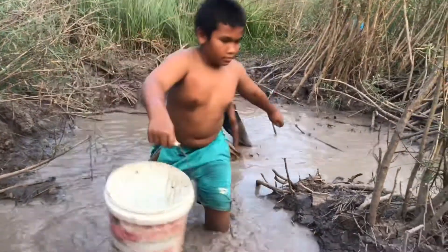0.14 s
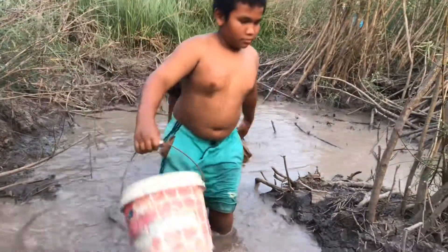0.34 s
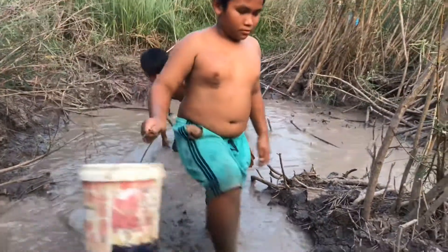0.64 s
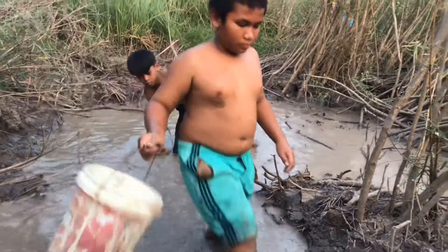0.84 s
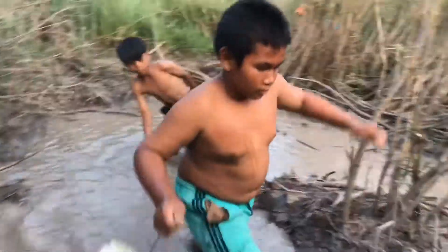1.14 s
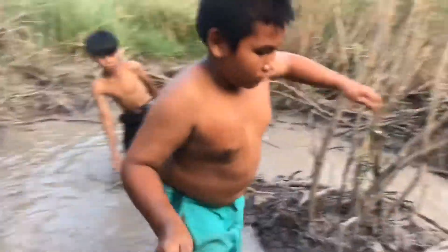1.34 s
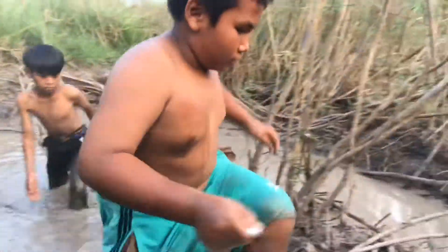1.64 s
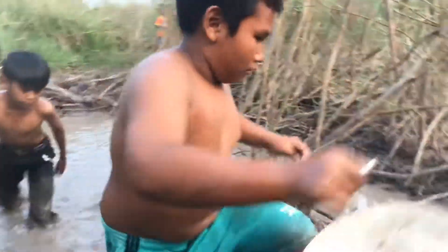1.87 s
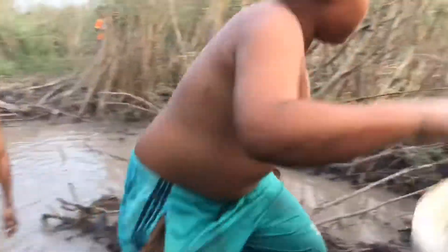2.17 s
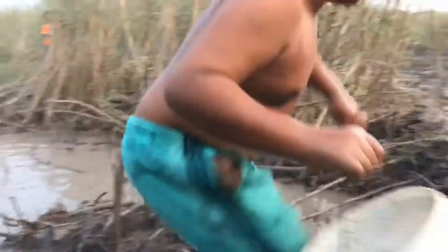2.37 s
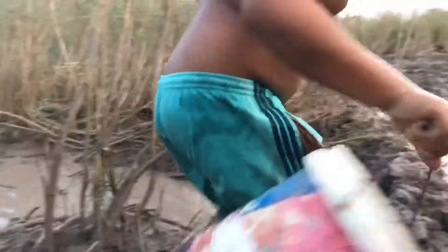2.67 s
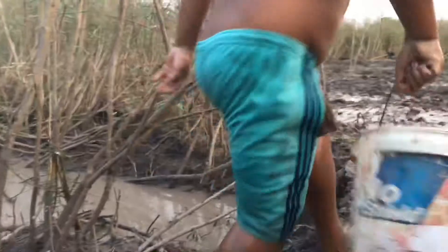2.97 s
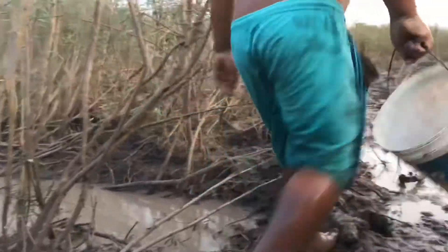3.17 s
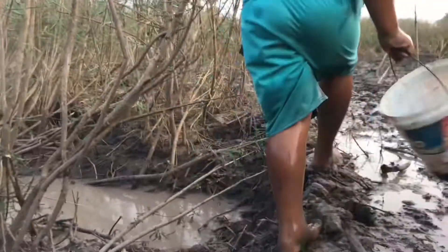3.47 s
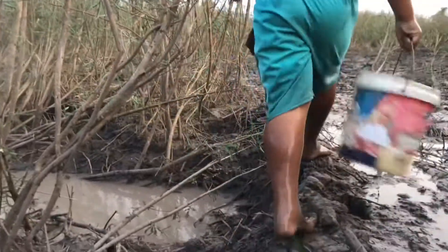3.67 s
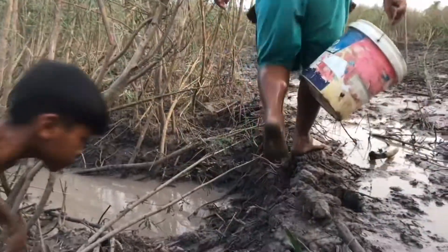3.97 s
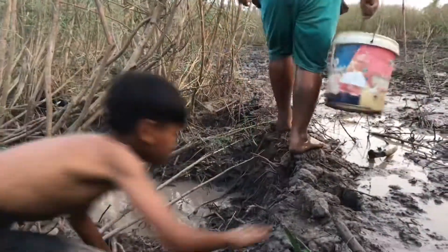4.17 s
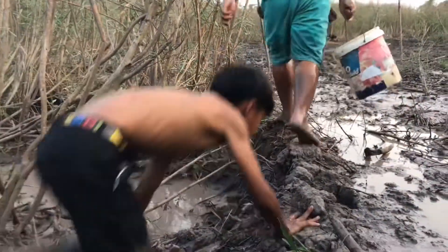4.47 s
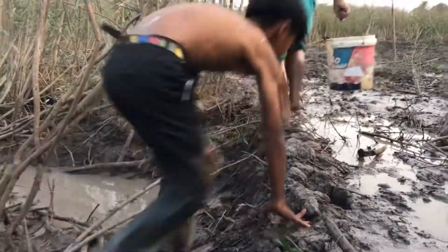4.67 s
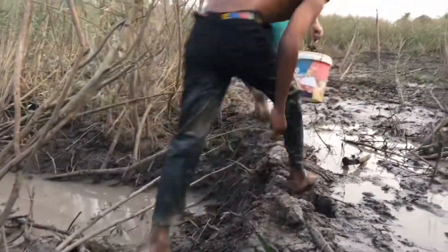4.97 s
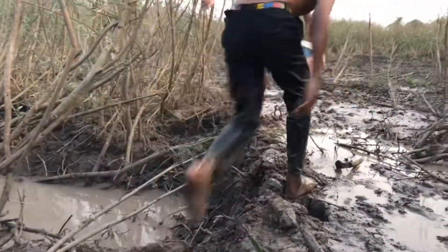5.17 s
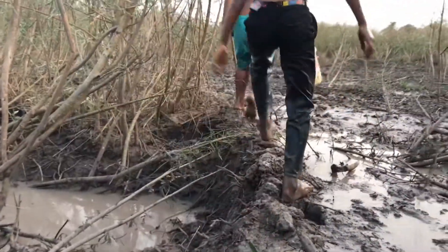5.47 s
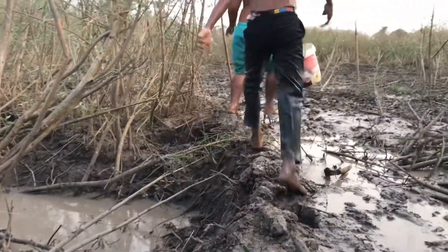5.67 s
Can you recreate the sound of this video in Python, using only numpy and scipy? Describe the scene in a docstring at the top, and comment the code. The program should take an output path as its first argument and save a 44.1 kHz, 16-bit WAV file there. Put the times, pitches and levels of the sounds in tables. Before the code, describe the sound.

Close handheld pickup of wading in shallow water and soft mud: small drips and squelches first, one hollow bucket bump, then heavier churning, popping splats and sucking gulps. Another burst of wet steps comes around four and a half seconds. Soft low rumble surges on the microphone; finally only faint air, tiny wet ticks and a far bird remain.

```python
"""Wading out of a muddy pond

Two children wade barefoot out of a shallow muddy pond and climb a soft bank, one with a plastic bucket.
Water and mud are swarms of ringing bubbles, bursting films and flickering noise, swelling with each step;
splats, spits, gulps and dull close knocks are placed singly. The bucket rings from one hard bump and two faint
touches. Filtered noise makes the low rumble and faint hiss of open air; gliding tones make a far bird."""
import sys
import numpy as np
from scipy import signal
from scipy.io import wavfile
from scipy.ndimage import uniform_filter1d

SR = 44100
rng = np.random.default_rng(int(sys.argv[2]) if len(sys.argv) > 2 else 0)


def inscribe(sig):
    """Save sig as 16-bit PCM at rate SR to the path in sys.argv[1].

    A 1-D sig is mono; a 2-D sig holds one channel per row.
    Samples are clipped to [-1, 1] before scaling.
    """
    pcm = np.round(np.clip(np.atleast_2d(sig).T, -1, 1) * 32767)
    wavfile.write(sys.argv[1], SR, pcm.astype(np.int16))


N = 256220
TIME = np.arange(N) / SR


def from_db(db):
    """Amplitude factor for a level in dB."""
    return 10 ** (np.asarray(db) / 20)


def rms_one(x):
    """Scale a sound to rms 1."""
    return x / np.sqrt(np.mean(x ** 2) + 1e-20)


def in_time(rows):
    """Each column of a curve, drawn sample by sample against its first column, time."""
    times_s, *columns = np.transpose(rows)
    return [np.interp(TIME, times_s, column) for column in columns]


def at_hz(points, hz):
    """Level of a spectrum in dB, falling 30 dB per octave beyond its ends."""
    point_hz, point_db = np.transpose(points)
    octaves_beyond = np.abs(np.log2(hz / np.clip(hz, point_hz[0], point_hz[-1])))
    return np.interp(np.log(hz), np.log(point_hz), point_db) - 30 * octaves_beyond


def band(x, low_hz, high_hz, order=2):
    """Keep one frequency band."""
    edges_hz = [low_hz, min(high_hz, .45 * SR)]
    return signal.sosfilt(signal.butter(order, edges_hz, "band", fs=SR, output="sos"), x)


def add(out, start_s, sound):
    """Mix a sound in at its start time."""
    i = int(np.clip(round(start_s * SR), 0, N))
    out[i:i + len(sound)] += sound[:N - i]


def drift(rate_hz):
    """Slow random wander with spread 1, computed at a twentieth of the sample rate."""
    pole = np.exp(-40 * np.pi * rate_hz / SR)
    white = rng.standard_normal(N // 20 + 2002)
    slow = signal.lfilter([1], [1, -2 * pole, pole * pole], white)[2000:]  # skip the filter's settling
    return np.interp(np.arange(N) / 20, np.arange(len(slow)), rms_one(slow))


def evened(x):
    """Hold a texture near rms 1 over every twentieth of a second."""
    return x / np.sqrt(np.abs(uniform_filter1d(x ** 2, size=SR // 20)) + 1e-12)


def wash(spectrum, patchy_db, flicker_hz):
    """Noise in narrow bands that each flicker on their own."""
    edges_hz = np.geomspace(20, 17000, 27)
    out, white = np.zeros(N), rng.standard_normal((2, N))
    for k, (low_hz, high_hz) in enumerate(zip(edges_hz, edges_hz[1:])):
        level_db = at_hz(spectrum, np.sqrt(low_hz * high_hz))
        if level_db > -50:
            flicker = from_db(level_db + patchy_db * drift(flicker_hz))
            out += band(white[k % 2], low_hz, high_hz) * flicker  # neighbours use separate noises
    return rms_one(out)


def bubble(hz, t60_s, rise):
    """A ringing air pocket whose pitch climbs, by the fraction rise over t60, as it nears the surface."""
    t = np.arange(int(t60_s * SR) + 2) / SR
    phase = 2 * np.pi * hz * t * (1 + rise * t / t60_s / 2)
    return np.sin(phase) * from_db(-60 * t / t60_s)


def bubbles(spectrum, per_s, cycles, spread_db, rise):
    """A swarm of bubbles of random pitch and strength; cycles is their mean count before falling 60 dB."""
    out = np.zeros(N)
    low_hz, high_hz = spectrum[0][0], spectrum[-1][0]
    when, where, size, damping, sign = rng.random((int(per_s * N / SR), 5)).T
    pitches_hz = low_hz * (high_hz / low_hz) ** where
    sizes_db = spread_db * np.minimum(-np.log(1 - size), 4)
    # high bubbles are sparser per Hz and shorter, so height grows with pitch to keep the spectrum
    heights = from_db(at_hz(spectrum, pitches_hz) + sizes_db) * pitches_hz * np.sign(sign - .5)
    lives_s = cycles * (.5 + damping) / pitches_hz
    for start_s, hz, height, life_s in zip(when * N / SR, pitches_hz, heights, lives_s):
        add(out, start_s, height * bubble(hz, life_s, rise))
    return rms_one(out)


def crackle(spectrum, per_s, spread_db):
    """Tiny films of wet mud bursting: broad clicks, each a short puff of noise."""
    sizes = from_db(spread_db * np.minimum(rng.exponential(1, N), 4))
    clicks = sizes * (rng.random(N) < per_s / SR)
    puffs = signal.lfilter([1], [1, -np.exp(-1 / (.0006 * SR))], clicks + 1e-18)  # 0.6 ms decay
    return rms_one(puffs * wash(spectrum, patchy_db=3, flicker_hz=60))


def glide(rows):
    """Phase and height of a gliding tone, silent outside its span."""
    hz, level_db = in_time(rows)
    sounding = (TIME > rows[0][0]) & (TIME < rows[-1][0])
    phase = 2 * np.pi * np.cumsum(hz * sounding) / SR
    return phase, from_db(level_db) * uniform_filter1d(sounding * 1., size=128)


def swells(rows, attack_share, release_s):
    """Power of a run of movements: each swells, holds to its end and dies away."""
    power = np.zeros(N)
    for start_s, length_s, level_db in rows:
        rise = np.clip((TIME - start_s) / (attack_share * length_s), 0, 1)
        fall = np.exp(-np.clip((TIME - start_s - length_s) / release_s, 0, 20))
        power += (from_db(level_db) * rise * fall) ** 2
    return power


def open_air():
    """Open air as patchy noise: mostly low, with a faint hiss."""
    # spectrum of the open air: hz [Hz], level_db [relative dB per Hz]
    air_colour = [(25, -14), (40, 5.5), (58, 5), (90, 1), (140, -2.5), (250, -23), (500, -19.5),
                  (1000, -20), (3000, -32.5), (8000, -31.5), (16000, -26)]
    return from_db(-52.5) * wash(air_colour, patchy_db=4, flicker_hz=7.8)


def rumble():
    """Low noise that surges on the microphone as it is swung round."""
    # strength of the rumble: time_s [s], level_db [dB rms]
    rumble_curve = [(0.0, -76), (0.4, -50), (0.75, -61), (1.6, -58), (2.05, -50), (2.5, -47), (3.1, -45.5),
                    (3.4, -60), (4.4, -63), (4.6, -45.5), (4.95, -55), (5.81, -52.5)]
    # its spectrum: hz [Hz], level_db [relative dB per Hz]
    rumble_colour = [(22, 7.5), (40, -2), (62, 8), (90, -5), (130, 0), (200, -18)]
    return from_db(in_time(rumble_curve)[0]) * evened(wash(rumble_colour, patchy_db=1.5, flicker_hz=1.4))


def stirring(lean):
    """Strength of strokes and lapping for a part leaning with their tilt (1), against it (-1) or neither (0)."""
    # a foot drags through water, presses into mud or pulls free:
    # start_s [s], length_s [s], level_db [dB before each part's trim], tilt_db [dB: low = slosh, high = spray]
    foot_strokes = [(0.185, 0.063, -49, -7), (0.25, 0.15, -46.5, -7.5), (0.419, 0.13, -44.5, 2),
                    (0.69, 0.067, -45, 0), (0.78, 0.056, -50.5, 12), (1.17, 0.005, -43, -9),
                    (1.22, .04, -50, -4), (1.309, 0.1, -43.5, -6.5), (1.48, 0.11, -47.5, 3),
                    (1.71, 0.12, -55.5, -15), (1.98, 0.082, -46, -5.5), (2.098, 0.1, -41.5, -5),
                    (2.23, 0.13, -45.5, -2), (2.441, 0.029, -47.5, 8), (2.525, 0.036, -43, 3),
                    (2.588, 0.056, -42, -6), (2.99, 0.1, -48, -9.5), (3.12, 0.031, -38.5, -0.5),
                    (3.181, 0.055, -42.5, -8), (3.22, 0.086, -45.5, 1), (3.319, 0.069, -37.5, 2),
                    (3.419, 0.14, -44.5, -1), (3.72, 0.042, -47.5, -5.5), (3.794, 0.046, -39.5, -1),
                    (3.91, 0.21, -45, 5), (3.988, 0.13, -43.5, 9), (4.27, 0.068, -41.5, -2),
                    (4.36, 0.12, -50.5, -6), (4.50, 0.019, -44.5, 2.5), (4.55, 0.059, -43.5, 4.5),
                    (4.66, 0.037, -52.5, 7), (4.855, .04, -56, 1.5), (5.034, 0.042, -60, 14)]
    # stirred water laps and drips between strokes, until the children are up the bank:
    # time_s [s], level_db [dB before each part's trim], tilt_db [dB, as above]
    lapping = [(0, -55, 0), (0.15, -54, -3), (0.6, -51, 0), (1.05, -50.5, -7.5), (1.65, -52, 1),
               (1.9, -62, -8.5), (2.15, -43.5, -2.5), (2.8, -51, -0.5), (3.3, -48, -0.5), (3.7, -51, 0),
               (4.5, -51.5, 2.5), (4.8, -66, 7), (5.15, -65, 14), (5.4, -65, 1.5), (5.65, -70, 5),
               (5.81, -58.5, 3)]
    lap_db, lap_tilt_db = in_time(lapping)
    leaning = [(start_s, length_s, level_db + lean * tilt_db)
               for start_s, length_s, level_db, tilt_db in foot_strokes]
    stroke_power = swells(leaning, attack_share=0.34, release_s=0.03)
    return np.sqrt(stroke_power + from_db(lap_db + lean * lap_tilt_db) ** 2)


def wading():
    """Legs churn and slosh the water; the mud squelches in fits and throws a fine spray of droplets."""
    # spectra of low churn, water slosh, mud squelch and fine spray: hz [Hz], level_db [relative dB per Hz]
    churn_colour = [(70, -5.5), (140, -11.5), (260, 3), (400, -4.5), (600, -7.5), (1000, -35.5)]
    slosh_colour = [(300, -43.5), (500, -1), (750, 3.5), (1050, 3), (1400, -5), (1800, -8.5), (2600, -17.5)]
    squelch_colour = [(1100, 5.5), (1700, 2), (2300, 0), (3100, 1.5), (4200, -9), (5500, -15), (8000, -20)]
    spray_colour = [(3500, -2), (5000, -0.5), (6300, -3.5), (9000, -2), (12000, -2), (16000, -4)]
    # the spray's top brightens until about 5.1 s, then dulls again: time_s [s], top_db [dB gain above 9 kHz]
    crispness = [(0, -21), (.9, -7.5), (1.7, -7), (2.3, -1), (3.4, -1), (4.1, 0), (4.6, 0.5), (5.1, 3),
                 (5.81, -20)]
    # a leg shoves deep water aside: start_s [s], length_s [s], level_db [dB rms]
    leg_surges = [(0.20, 0.2, -50.5), (0.93, .17, -44.5), (1.15, 0.097, -41.5), (1.63, .21, -44.5),
                  (2.01, .19, -40), (2.22, .20, -40.5), (2.43, 0.22, -37), (2.73, 0.17, -40.5),
                  (2.99, 0.08, -38.5), (3.16, 0.22, -50.5), (3.49, 0.28, -51), (4.24, 0.033, -50.5),
                  (4.48, .14, -49)]
    churn_rest_db = -58.5  # the low churn between surges
    slosh_db, squelch_db, spray_db = -3, -2.55, -5.5  # trims against the stirring strength
    spatter_db, spatter_hz = 1, 34  # mud gives way in fits: spread and pace of the unevenness

    def bed(spectrum):
        """Flickering noise beneath the bubbles."""
        return wash(spectrum, patchy_db=3, flicker_hz=40)

    churn = bubbles(churn_colour, per_s=170, cycles=9.7, spread_db=2, rise=0.19)
    churn += from_db(-5) * bed(churn_colour)

    slosh = bubbles(slosh_colour, per_s=450, cycles=33.4, spread_db=3.5, rise=0.16)
    slosh += from_db(-5.5) * bed(slosh_colour)

    squelch = bubbles(squelch_colour, per_s=700, cycles=52, spread_db=4.5, rise=0.11)
    squelch += from_db(-5.5) * crackle(squelch_colour, per_s=450, spread_db=2.0)
    squelch += from_db(-1.5) * bed(squelch_colour)

    spray = bubbles(spray_colour, per_s=800, cycles=77, spread_db=6.5, rise=.03)
    spray += from_db(1) * crackle(spray_colour, per_s=480, spread_db=3.0)
    spray += from_db(5.5) * bed(spray_colour)
    top = signal.sosfiltfilt(signal.butter(2, 9000, "high", fs=SR, output="sos"), spray)
    spray += (from_db(in_time(crispness)[0]) - 1) * top

    surge_power = swells(leg_surges, attack_share=0.2, release_s=.035)
    water = np.sqrt(surge_power + from_db(churn_rest_db) ** 2) * evened(churn)
    water += from_db(slosh_db) * stirring(lean=-1.05) * evened(slosh)
    mud = from_db(squelch_db) * stirring(lean=0) * evened(squelch)
    mud += from_db(spray_db) * stirring(lean=0.9) * evened(spray)
    return water + from_db(spatter_db * drift(spatter_hz)) * mud


def spits():
    """Spat mud and snapping stalks: a bright snap of noise with a brief trail of droplets."""
    # the sharpest spits: start_s [s], level_db [dB, 8 above the gain of the noise]
    mud_spits = [(0.212, -38), (0.374, -29.5), (0.551, -32), (0.7958, -27.5), (0.836, -30), (1.111, -31),
                 (1.1423, -27), (1.503, -27.5), (1.584, -30), (2.365, -31), (2.4188, -30.5), (2.456, -31),
                 (2.533, -28.5), (2.549, -29), (2.6352, -27), (2.747, -31.5), (2.89, -33), (3.1502, -27.5),
                 (3.37, -25), (3.5767, -28), (3.9097, -33), (4.0286, -32), (4.1099, -25), (4.22, -35.5),
                 (4.515, -24), (4.6955, -27.5), (4.723, -35), (4.8597, -34), (5.3316, -42.5),
                 (5.7004, -39.5)]
    out, t = np.zeros(N), np.arange(SR // 20) / SR
    fade = np.exp(-t / 0.0031) + from_db(-5.5) * np.exp(-t / 0.0058)
    for start_s, level_db in mud_spits:
        snap = band(rng.standard_normal(len(t)) * fade, 1800, 12000, order=1)
        add(out, start_s, from_db(level_db - 8.0) * snap)
    return out


def bucket():
    """The plastic wall clacks, then the hollow body booms; the rings waver as the bucket swings."""
    # bumps on the bucket, one hard and two faint: start_s [s], gain_db [dB on all its rings]
    bucket_bumps = [(0.374, -52), (1.1423, -1.5), (1.1763, -31)]
    # rings of the wall: pitch_hz [Hz], level_db [dB against the bump's gain], t60_s [s]
    wall_modes = [(580, -20, 0.046), (864, -12.5, 0.043), (918, -22, 0.19), (1110, -7.5, 0.023),
                  (1238, -1, 0.02), (1430, -16, 0.026), (1640, -23, 0.068), (1710, -21, 0.036),
                  (2300, -47, 0.04), (2720, -31.5, 0.061), (3300, -23, 0.027), (3600, -42, 0.1)]
    # rings of the floor and the air inside: pitch_hz [Hz], level_db [dB against the bump's gain], t60_s [s]
    drum_modes = [(78.4, -25, 0.033), (136.5, -15.5, 0.32), (167, 6.5, 0.0292), (261.4, -16, 0.22),
                  (270, -30, 0.17), (368, -41.5, 0.01)]
    out, t = np.zeros(N), np.arange(SR // 2) / SR

    def ringing(modes, rise_s):
        """Sum of decaying sines whose phases wander, swelling in together."""
        rings = np.zeros(len(t))
        for pitch_hz, level_db, t60_s in modes:
            waver = np.minimum(8 * t, .35) * drift(25)[:len(t)]  # radians
            rings += from_db(level_db - 60 * t / t60_s) * np.sin(2 * np.pi * pitch_hz * t + waver)
        return rings * (1 - np.exp(-t / rise_s))

    crack = band(rng.standard_normal(len(t)), 630, 3800) * np.exp(-t / 0.0032)
    for start_s, gain_db in bucket_bumps:
        clack = from_db(-22.5) * crack - ringing(wall_modes, rise_s=0.0011)
        boom = ringing(drum_modes, rise_s=0.0032)
        add(out, start_s, from_db(gain_db) * clack)
        add(out, start_s + 0.0014, from_db(gain_db) * boom)
    return out


def splats():
    """A pocket bursts: the film cracks, then a bubble note rings inside a short wet hiss."""
    # the loudest wet splats and popping bubbles: start_s [s], level_db [about peak dB], pitch_hz [Hz], t60_s [s]
    wet_splats = [(.407, -31, 1310, .03), (0.54, -27.5, 1450, .02), (0.734, -26.5, 1025, 0.026),
                  (0.751, -29.5, 282, .093), (.795, -33, 2146, 0.063), (0.998, -26.5, 252, 0.055),
                  (1.366, -30, 1010, 0.058), (1.395, -29, 947, 0.031), (1.996, -30.5, 1260, 0.031),
                  (2.113, -21.5, 1160, .05), (2.170, -19.5, 940, .023), (2.178, -28, 1670, .045),
                  (2.207, -26, 960, 0.042), (2.455, -24.5, 1710, 0.018), (2.551, -22, 1550, .015),
                  (2.579, -29.5, 1720, 0.027), (2.891, -27.5, 2840, 0.033), (3.1221, -25, 1020, .056),
                  (3.148, -24.5, 1223, 0.046), (3.190, -28, 730, 0.028), (3.3765, -37, 1710, 0.0082),
                  (3.377, -22, 569, 0.045), (3.592, -29.5, 1780, 0.052), (3.626, -31, 2230, 0.019),
                  (3.779, -27.5, 1580, 0.039), (3.805, -31, 2390, .041), (4.298, -28, 1310, 0.049),
                  (4.516, -31, 1655, 0.033), (4.599, -27.5, 1310, 0.021), (4.617, -31, 1230, 0.025),
                  (4.6955, -22.5, 1330, .017), (4.715, -29.5, 720, 0.016), (5.254, -44, 770, .019)]
    out, click = np.zeros(N), signal.unit_impulse(SR // 50)
    for start_s, level_db, pitch_hz, t60_s in wet_splats:
        note = bubble(pitch_hz, t60_s, rise=0.079)
        age = np.arange(len(note)) / len(note)
        noise = band(rng.standard_normal(SR // 4), pitch_hz / 1.88, pitch_hz * 1.57)
        hiss = rms_one(noise)[-len(note):] * from_db(-60 * age)
        opening = 1 - np.exp(-age / 0.054)  # long notes also open slowly
        crack = band(click, pitch_hz / 2, pitch_hz * 1.54)
        abrupt = np.minimum(0.017 / t60_s, 1) ** 2  # the shortest bursts crack hardest
        add(out, start_s, from_db(level_db) * opening * (from_db(1) * note + from_db(-3.5) * hiss))
        add(out, start_s, from_db(level_db - 1.5) * abrupt * crack / np.abs(crack).max())
    return out


def knocks():
    """Heavily damped thuds: a small tap, about two swings and a soft low after-swing."""
    # dull close knocks: start_s [s], level_db [about peak dB]
    dull_knocks = [(0.6215, -14), (0.6576, -25), (0.9322, -21), (0.9539, -26), (1.0343, -18.5),
                   (1.227, -21), (1.2405, -32), (1.4744, -26), (1.521, -22), (1.568, -17), (1.6203, -14.5),
                   (1.93, -25), (1.9649, -14), (2.147, -23), (2.387, -30), (2.446, -25.5), (2.4564, -21),
                   (2.481, -31), (2.5517, -25), (2.5797, -22.5), (2.6219, -24), (2.797, -27.5),
                   (2.836, -25.5), (2.870, -25), (2.9095, -24.5), (2.968, -24.5), (2.998, -23.5),
                   (3.016, -30), (4.196, -33.5), (4.4636, -32), (4.5068, -29.5), (4.533, -23),
                   (4.5664, -28), (4.6078, -26.5), (4.642, -27), (4.699, -30.5), (4.776, -33), (5.13, -42),
                   (5.362, -39.5)]
    # a harder knock is higher: pitch at the usual strength, and its climb
    usual_hz, usual_db, octaves_per_db = 266, -17, .028
    tap_db, sway_db = -9.5, -21  # bright tap and low after-swing of a hard knock, against the thud
    hard_db = -20.5  # weaker knocks than this are soft
    out, click = np.zeros(N), signal.unit_impulse(SR // 20)

    def swing(low_hz, high_hz):
        """A click ringing through a band, peak 1."""
        pulse = band(click, low_hz, high_hz)
        return pulse / np.abs(pulse).max()

    tap = swing(low_hz=585, high_hz=1220)
    sway = swing(low_hz=93, high_hz=153)
    for start_s, level_db in dull_knocks:
        pitch_hz = usual_hz * 2 ** (octaves_per_db * (level_db - usual_db))
        thud = swing(pitch_hz / 1.34, pitch_hz * 1.717)
        # a hard knock is brighter, a soft one boomier
        hardness_db = np.clip(1.4 * (level_db - hard_db), -10, 0)
        add(out, start_s - .0005, -from_db(level_db + hardness_db + tap_db) * tap)
        add(out, start_s, from_db(level_db) * (thud - from_db(sway_db - hardness_db) * sway))
    return out


def gulps():
    """A mud cavity throbs at a low gliding pitch; its flapping rim adds rough overtones and a gurgle."""
    # air pockets opening under a sinking or lifting foot, one table each:
    # time_s [s], pitch_hz [Hz], level_db [dB of the fundamental before its flutter]
    mud_gulps = [
        [(3.145, 345, -33), (3.151, 219, -26.5), (3.160, 123, -22), (3.180, 130, -32), (3.195, 183, -25.5),
         (3.205, 289, -28), (3.213, 298, -19.5), (3.223, 340, -32)],
        [(3.645, 161, -49), (3.666, 175, -35), (3.673, 204, -24.5), (3.686, 236, -32.5), (3.701, 221, -23.5),
         (3.712, 276, -37.5), (3.725, 526, -39.5), (3.745, 810, -46)],
        [(2.516, 209, -45), (2.522, 173, -41), (2.543, 183, -31), (2.551, 190, -45)],
    ]
    out = np.zeros(N)
    for rows in mud_gulps:
        phase, height = glide(rows)
        phase = phase + .35 * drift(70)
        flutter = from_db(2.2 * drift(150))
        overtones = sum(np.cos(k * phase + 1.2 * drift(90)) / k ** 1.6 for k in (2, 3))
        noise = rms_one(band(rng.standard_normal(N), low_hz=458, high_hz=633, order=3))
        gurgle = noise * (1 + np.sin(phase))  # swells on each throb
        out += height * flutter * (np.sin(phase) + overtones + from_db(-16.5) * gurgle)
    return out


def bird():
    """Thin gliding whistles of a far bird that flutter quickly in pitch and loudness."""
    # one table per whistle: time_s [s], pitch_hz [Hz], level_db [dB before the flutter]
    bird_whistles = [
        [(4.72, 3720, -68), (4.77, 3730, -71), (4.82, 3700, -72)],
        [(4.92, 3860, -72), (4.97, 3820, -69), (5.04, 3620, -69), (5.10, 3510, -67), (5.20, 3170, -70)],
        [(5.43, 3540, -68), (5.47, 3730, -69), (5.53, 3820, -67.5), (5.59, 3730, -70.5)],
        [(5.74, 3520, -72), (5.78, 3560, -68), (5.80, 3610, -67)],
    ]
    tones = np.zeros(N)
    for rows in bird_whistles:
        phase, height = glide(rows)
        tones += height * np.sin(phase + .7 * drift(60))
    return tones * from_db(4 * drift(35))


def scene():
    """All layers together, one channel."""
    surroundings = open_air() + rumble() + bird()
    steps = wading() + spits() + splats() + gulps()
    return (surroundings + steps + bucket() + knocks())[None]


def record(dry):
    """The microphone loses the deepest bass and a few narrow bands; the top is cut steeply."""
    # narrow dips in the microphone response: centre_hz [Hz], width_hz [Hz], depth [0-1]
    response_dips = [(460, 114, 0.55), (717, 120, 0.49), (4860, 400, 0.4), (7700, 660, 0.34),
                     (10440, 520, 0.46)]
    cutoff_hz = 16050
    heard = signal.sosfilt(signal.butter(4, 40, "high", fs=SR, output="sos"), dry)
    for centre_hz, width_hz, depth in response_dips:
        peak = signal.lfilter(*signal.iirpeak(centre_hz, centre_hz / width_hz, fs=SR), heard)
        heard = heard - np.clip(depth, 0, 1) * peak
    return signal.sosfilt(signal.ellip(12, .1, 85, cutoff_hz, fs=SR, output="sos"), heard)


dry = scene()
out = record(dry)
inscribe(out)
```